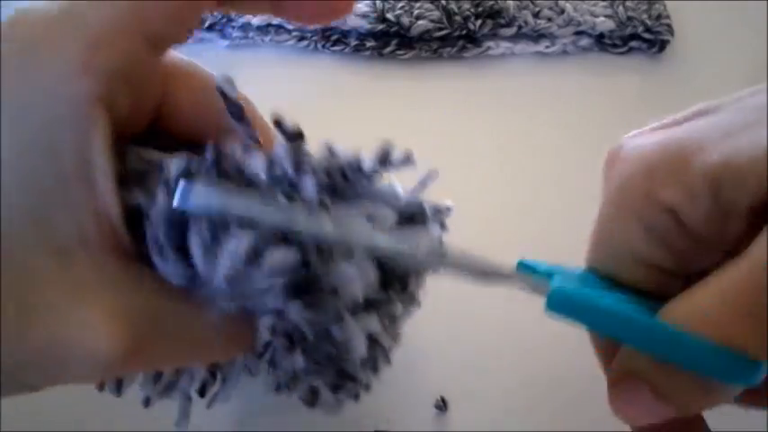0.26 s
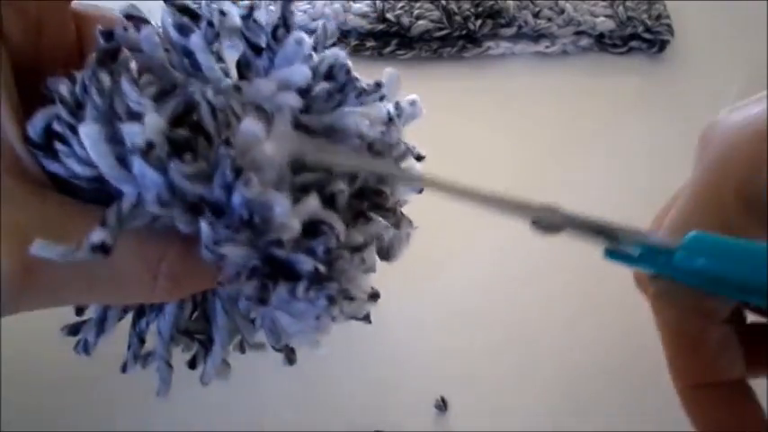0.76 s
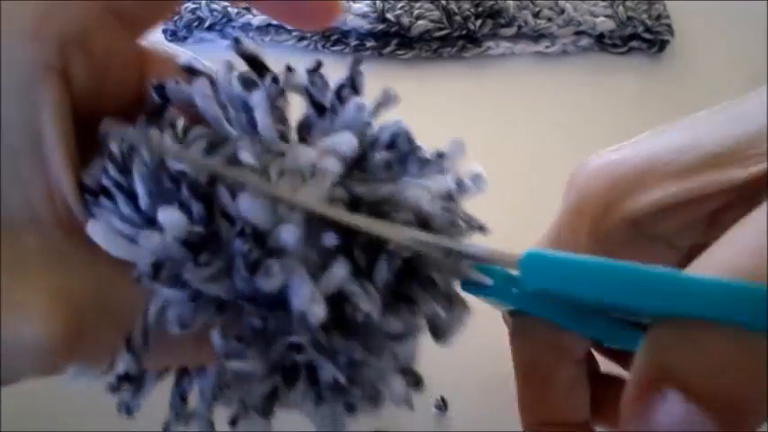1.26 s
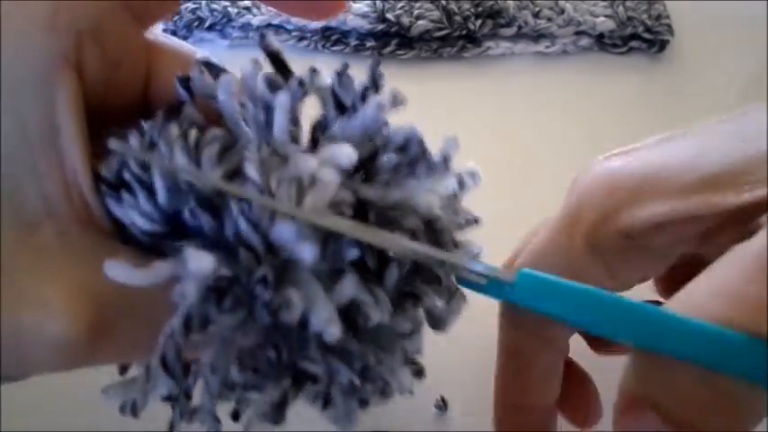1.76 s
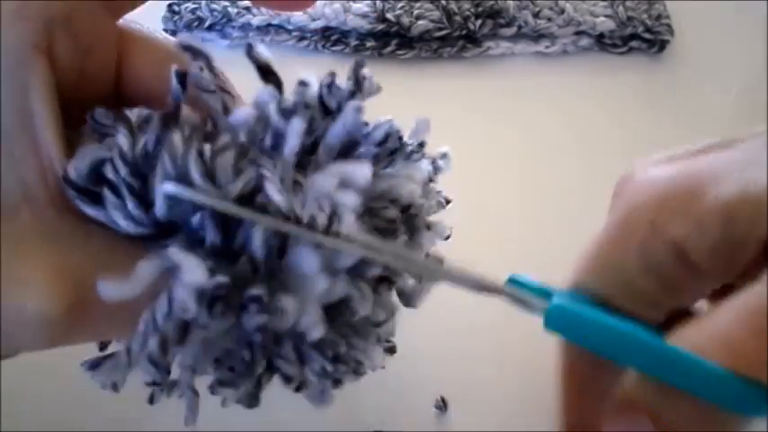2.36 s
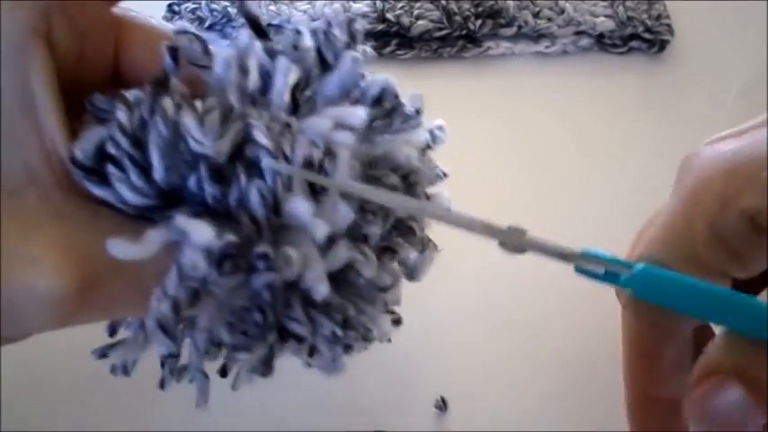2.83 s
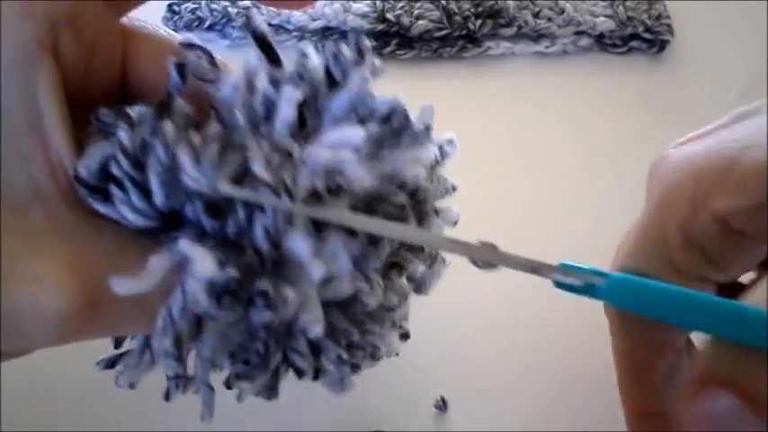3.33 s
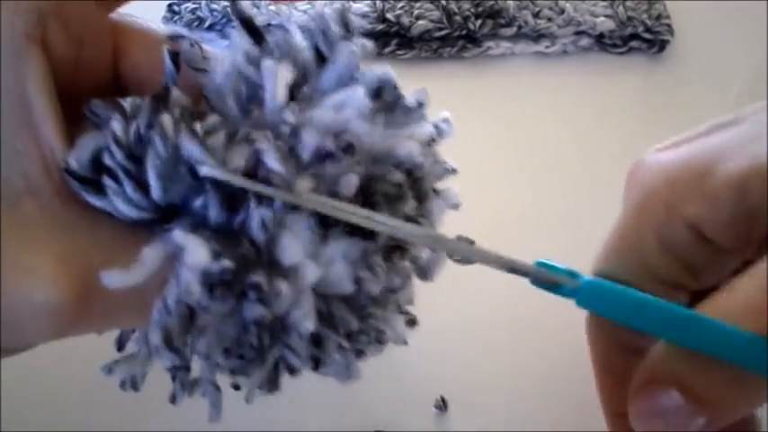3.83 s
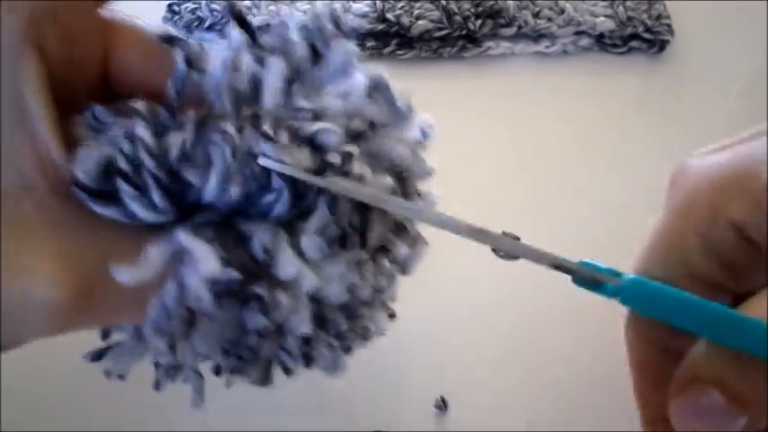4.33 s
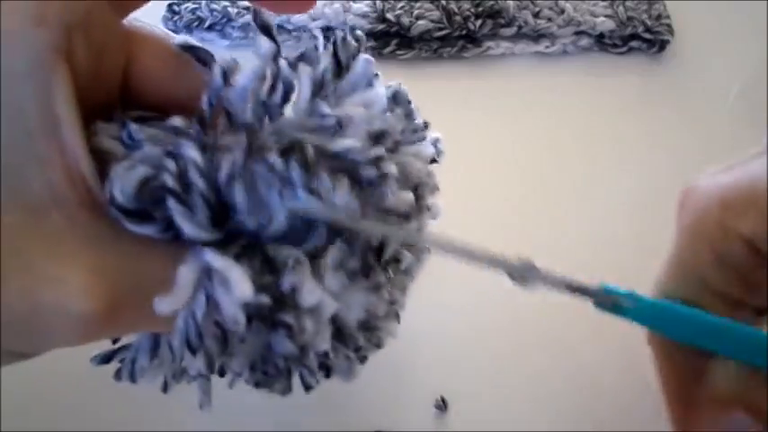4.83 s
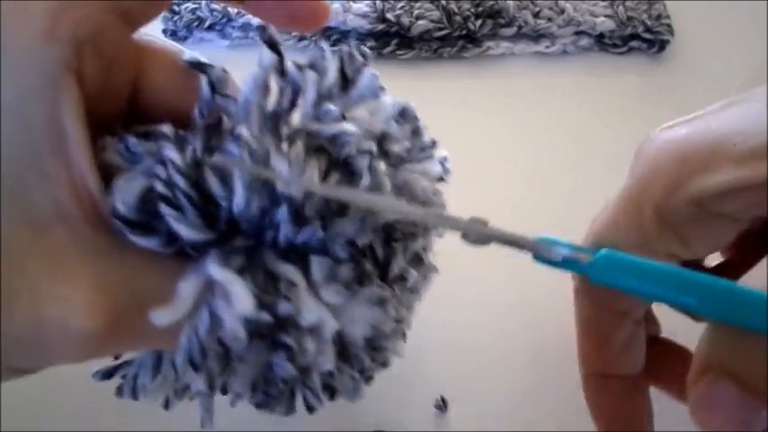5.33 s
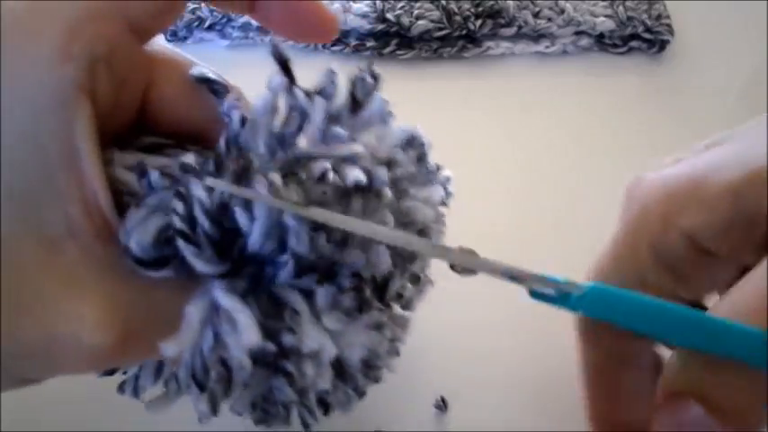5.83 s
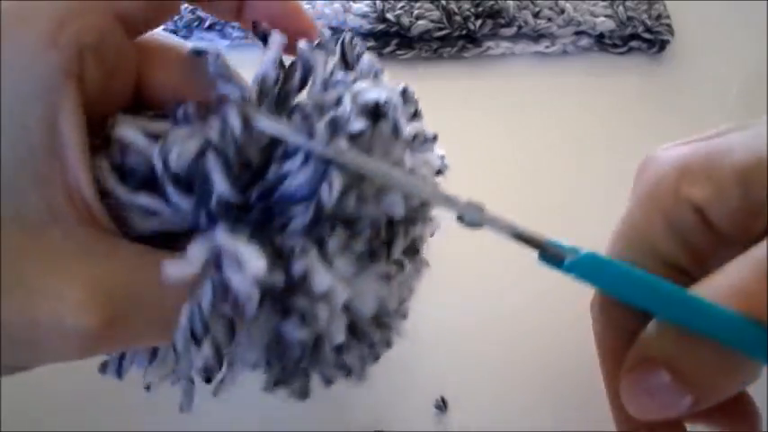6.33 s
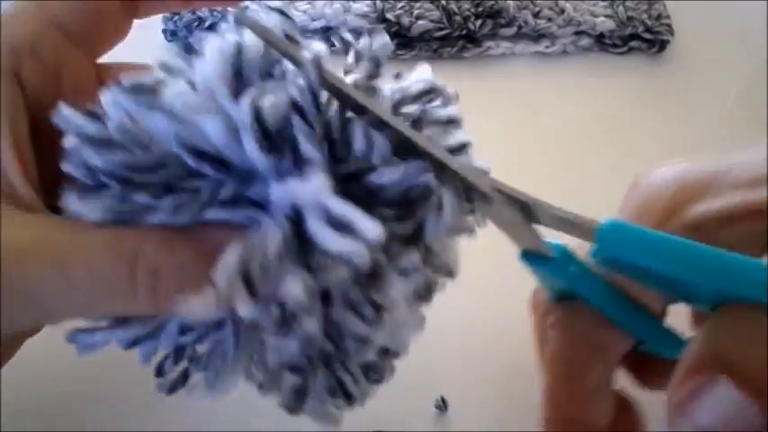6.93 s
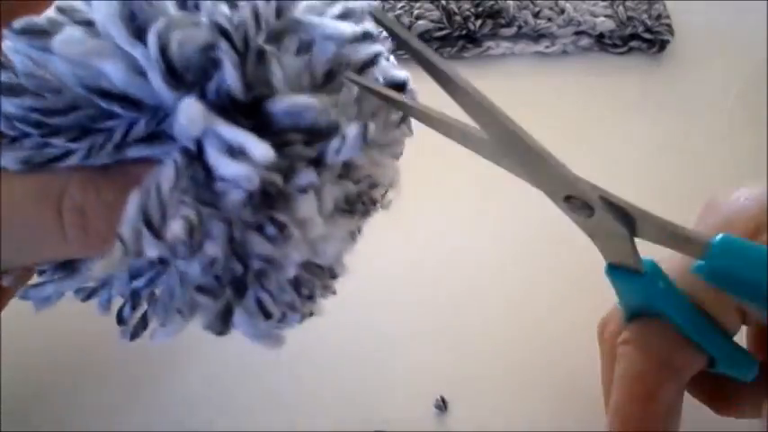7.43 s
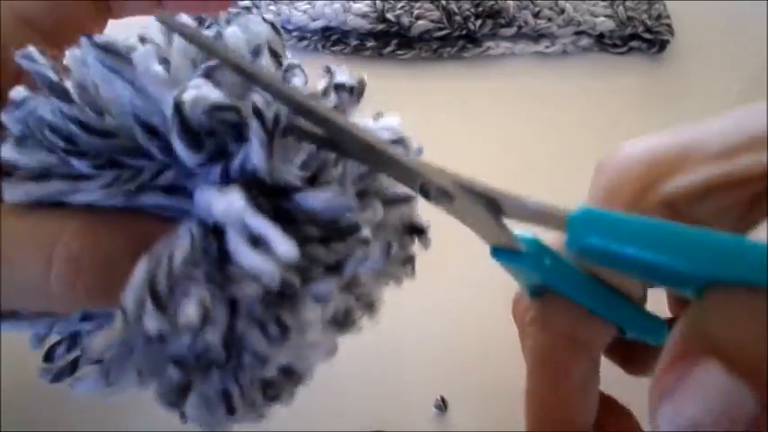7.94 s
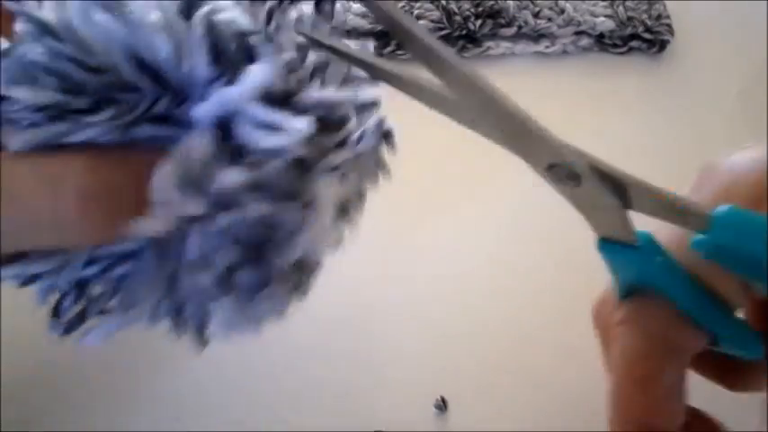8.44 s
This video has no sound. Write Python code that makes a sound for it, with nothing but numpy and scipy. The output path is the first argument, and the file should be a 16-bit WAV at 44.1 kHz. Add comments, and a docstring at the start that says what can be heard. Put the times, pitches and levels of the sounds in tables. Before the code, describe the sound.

Close scissor blades shear through yarn at an uneven pace, clicking shut and ticking open, with faint wool rustling between cuts.

```python
"""Scissors trim a woollen pompom close to a small microphone in a quiet room.
Each stroke shears a crowd of fibres that ring the blades, and tufts give way in bursts.
The blades may clack shut hard enough to overload; on reopening the pivot ticks and the edges scrape.
Between cuts the blades brush the yarn and the wool rustles in the hand."""
import sys
import numpy as np
from scipy import signal
from scipy.fft import rfft, irfft
from scipy.io import wavfile
from scipy.ndimage import uniform_filter1d, map_coordinates

SR = 44100
rng = np.random.default_rng(int(sys.argv[2]) if len(sys.argv) > 2 else 0)


def int16_out(signal):
    """Quantize to a 16-bit WAV file."""
    q = np.round(np.clip(np.atleast_2d(signal).T, -1, 1) * 32767)
    wavfile.write(sys.argv[1], SR, q.astype(np.int16))


N = 383229
TIME_S = np.arange(N) / SR
BIN_HZ = np.maximum(np.fft.rfftfreq(N, 1 / SR), 1)

# blade resonances while cutting: centre_hz, width_hz, level_db
BLADE_LOW_MODES = [(1890, 540, -22), (2260, 320, -11), (3070, 270, -4), (4060, 310, 3), (4580, 470, -0.5),
                   (5230, 530, -2.5)]
BLADE_HIGH_MODES = [(7000, 970, -1), (7800, 410, 2.5), (8390, 340, 3.5), (9880, 510, 0), (10750, 460, -4),
                    (15100, 590, -4)]
# wool crunch spectrum: freq_hz, level_db
CRUNCH_SPECTRUM = [(40, -3), (150, -2.5), (700, 5.5), (1500, -4.5), (2500, 2), (5000, 8), (12000, -36)]


def shear(cut_db=-0.5, brush_db=-1, treble_db=1, crunch_db=-14, grab_db=2.1):
    """Fibres snap between the edges and ring the blades; strands catch and tufts let go."""
    low_gain, high_gain = (
        np.hypot(undb(cut_db) * stroke_gain(treble) + undb(brush_db) * brush_gain(treble),
                 tuft_gain(treble))
        for treble in (False, True))
    snaps = fibres(5500, spread_db=4.5) * undb(grab_db * walk(380))
    low_ring = low_gain * blade_glide(resonate(snaps, BLADE_LOW_MODES))
    high_ring = undb(treble_db) * high_gain * resonate(snaps, BLADE_HIGH_MODES)
    crunch = undb(crunch_db) * low_gain * colour(snaps, CRUNCH_SPECTRUM)
    return low_ring + high_ring + crunch


# cuts: bite_s, attack_s, hold_s, release_s, level_db, growth_db, bright_db, pitch_ratio
STROKES = [ (0.139, 0.039, 0.056, 0.0083, -40, 9, 3.5, 0.97),
           (1.407, .032, 0.027, .022, -46, -3.5, 3, 0.95), (2.914, .014, 0.041, 0.013, -43.5, 2, 3.5, 1.06),
           (3.353, 0.021, .048, .005, -46.5, -6.5, 4.5, 1.09),
           (3.789, 0.049, 0.025, 0.046, -39.5, -0.5, -1.5, 1.04),
           (4.177, 0.0239, 0.0432, 0.017, -40, 5.5, -0.5, 1.03),
           (4.578, .025, 0.0073, 0.011, -37.5, 0, 1, 1.03), (5.61, .018, 0.087, .011, -40, 4.5, -0.5, 1.03),
           (6.056, 0.011, 0.029, .015, -39.5, 2.5, 2.5, 0.97),
           (7.014, 0.039, .064, 0.0073, -41.5, 4.5, -0.5, 1),
           (8.095, 0.015, 0.036, 0.0056, -38.5, 6, 3, 0.94), ]


def stroke_gain(treble, dulling_db=0.5):
    """Envelope of the cuts; the treble dulls as wool packs between the edges."""
    return sum(gesture(bite_s, attack_s, hold_s, release_s,
                       db + treble * (bright_db + dulling_db / 2), growth_db - treble * dulling_db)
               for bite_s, attack_s, hold_s, release_s, db, growth_db, bright_db, _ in STROKES)


def blade_glide(x, glide_ratio=0.05):
    """Blade pitch rises in each stroke as the crossing point runs towards the tips."""
    points = []
    for bite_s, attack_s, hold_s, release_s, *_, pitch_ratio in STROKES:
        points.append((bite_s - attack_s, pitch_ratio * (1 - glide_ratio / 2)))
        points.append((bite_s + hold_s + release_s, pitch_ratio * (1 + glide_ratio / 2)))
    speed = np.interp(TIME_S, *np.transpose(points))
    return map_coordinates(x, [np.cumsum(speed) % (N - 1)], order=3)


# tuft bursts: peak_s, level_db, half_width_s, bright_db
TUFTS = [(.151, -39.5, 0.0072, 8.5), (.1955, -24, 0.0015, 4.5), (0.217, -24, 0.00076, 13),
         (2.947, -38.5, 0.0034, 3), (2.954, -33, 0.0016, 7), (2.9645, -31.5, 0.0011, 0),
         (3.36, -38, 0.0041, -4), (3.398, -40, 0.0022, 1), (3.761, -44.5, 0.0024, 4.5),
         (3.797, -28.5, .0018, -5.5), (4.184, -36, .0047, -3), (4.215, -30.5, 0.0046, 2),
         (4.585, -33, .0022, -3), (4.613, -39, 0.0031, 4), (5.644, -36, 0.0063, -5),
         (5.697, -31, 0.0019, 1), (6.0925, -32, 0.0014, 6), (7.059, -41, .0033, -6), (8.122, -37, .002, 8),
         (8.136, -28, 0.0036, 0.5)]


def tuft_gain(treble):
    """Envelope of the thickest tufts giving way."""
    gain = np.zeros(N)
    for peak_s, db, half_width_s, bright_db in TUFTS:
        add(gain, peak_s - 2 * half_width_s, undb(db + treble * bright_db) * swell(half_width_s))
    return gain


# blade brushes: peak_s, fade_s, level_db, bright_db
BRUSHES = [(1.63, .036, -56.5, 7), (1.906, 0.083, -48, 2), (2.085, .08, -64.5, 9.5),
           (2.288, 0.066, -50, 2.5), (2.52, .05, -56.5, 6), (2.65, .12, -62, 7.5), (5.113, .026, -52, -2)]


def brush_gain(treble):
    """Envelope of the blades passing lightly through the yarn."""
    return sum(gesture(peak_s, fade_s, 0, fade_s, db + treble * bright_db)
               for peak_s, fade_s, db, bright_db in BRUSHES)


# blade closures: start_s, level_db, pitch_ratio, hardness_db
CLACKS = [(.2185, 1, 1.01, -5), (2.9674, 2, 1.02, -1.5), (3.4027, -1, 0.987, -3), (4.6202, 1, 1.04, -2),
          (6.1102, -11, 1.06, -11), (7.0817, -10, 1.03, -9), (8.1437, -2, 0.99, -7.5)]
# clack spectra of steel, plastic handles and sideways radiation: freq_hz, level_db
STEEL_SPECTRUM = [(60, -51), (600, -31), (1500, -39), (2600, -35), (3300, -32.5), (4500, -28.5),
                  (5200, -14.5), (6300, -10), (7200, -7.5), (8050, -1.5), (8600, -6.5), (9200, -21.5),
                  (10000, -19.5), (12000, -28.5), (16000, -22)]
JOLT_SPECTRUM = [(60, -4), (250, 1), (650, 2.5), (1000, -11.5), (1400, -2), (1900, -5), (2600, 0),
                 (3000, -16), (4600, 3), (6000, -7.5), (12000, -22)]
SIDEWAYS_SPECTRUM = [(100, -32), (1500, -27), (2600, -10.5), (4800, -14), (6400, 2), (7300, 0), (8150, 3),
                     (9200, -13), (10500, -13), (12000, -35), (16000, -50)]


def clacks(jolt_db=-24, jolt_lag_s=0.0006):
    """Blades meet, then the blow reaches the handles. Returns direct and sideways sound."""
    jolts = strikes(CLACKS, JOLT_SPECTRUM, chatter_gain=0.078, chatter_s=0.0018)
    steel = strikes(CLACKS, STEEL_SPECTRUM, chatter_gain=0.073, chatter_s=0.00091)
    sideways = strikes(CLACKS, SIDEWAYS_SPECTRUM, chatter_gain=0.046, chatter_s=0.0007)
    return steel + undb(jolt_db) * np.roll(jolts, int(jolt_lag_s * SR)), sideways


# pivot contacts: start_s, level_db, pitch_ratio, hardness_db
TICKS = [(.0893, -36.5, 1.03, 0), (.332, -43, 1.15, -10), (2.143, -40, 0.92, -16), (3.1204, -10, 1, 8.5),
         (3.527, -19, 0.96, 6), (3.5285, -27, 0.76, -2), (4.8218, -33.5, 0.97, 1), (4.831, -32, 0.92, -6),
         (5.123, -43, 0.83, -4), (6.742, -19.5, 0.99, -3)]
# steel under a tick: freq_hz, level_db
TICK_SPECTRUM = [(100, -31), (2000, -42), (4000, -18), (5200, -26), (6300, -11.5), (7200, -21.5),
                 (8000, -0.5), (8700, 0.5), (10000, -13), (12000, -21.5), (15300, -13.5), (16500, -9.5)]


def pivot_ticks():
    """The pivot ticks as the blades reopen or shift."""
    return strikes(TICKS, TICK_SPECTRUM, chatter_gain=0.15, chatter_s=0.0021)


# edge squeaks: peak_s, level_db, half_width_s, slip_hz, second_harmonic_db
SQUEAKS = [(7.071, -44.5, 0.0076, 2160, 13.5), (8.1385, -16.5, 0.00121, 4034, -7)]


def squeaks(jitter_ratio=0.02):
    """Near the tips the edges stick and slip at a rough pitch."""
    out, wobble = np.zeros(N), walk(700)
    for peak_s, db, half_width_s, slip_hz, second_db in SQUEAKS:
        gain = undb(db) * swell(half_width_s)
        pitch_hz = slip_hz * (1 + jitter_ratio * wobble[int(peak_s * SR):][:len(gain)])
        phase = 2 * np.pi * np.cumsum(pitch_hz) / SR
        tone = np.sin(phase) + undb(second_db) * np.sin(2 * phase)
        add(out, peak_s - 2 * half_width_s, np.sqrt(2) * gain * tone)
    return out


# edges sliding apart: start_s, level_db, t60_s
SCRAPES = [(.331, -47.5, 0.23), (3.5265, -37, 0.025), (4.821, -39.5, 0.039), (6.741, -43.5, 0.076),
           (7.209, -40.5, 0.12), (8.275, -43, 0.15)]
# free blade resonances: centre_hz, width_hz, level_db
BLADE_FREE_MODES = [(1490, 500, -14), (3130, 590, -10.5), (3950, 520, -1), (5200, 730, -12),
                    (8000, 730, -5.5), (15300, 570, -14)]


def scrapes():
    """Bare edges rub as the scissors reopen."""
    return decays(SCRAPES) * resonate(fibres(5000, spread_db=0.5), BLADE_FREE_MODES)


# finger bumps: start_s, level_db, t60_s
KNOCKS = [(.194, -36.5, 0.038), (2.141, -41, 0.16), (8.134, -45, 0.096)]
# handle spectrum: freq_hz, level_db
HANDLE_SPECTRUM = [(30, -35), (110, 2.5), (170, -10), (240, 5), (400, -15), (650, -16), (2000, -24),
                   (8000, -50)]


def knocks():
    """Fingers bump the plastic handles."""
    return decays(KNOCKS) * colour(rng.standard_normal(N), HANDLE_SPECTRUM)


# wool shifting in the hand: peak_s, fade_s, level_db
RUSTLES = [(.914, 0.054, -57.5), (.998, 0.074, -50.5), (1.1, 0.14, -47), (5.425, .11, -51),
           (6.56, .3, -59.5)]
# rustle spectrum: freq_hz, level_db
WOOL_SPECTRUM = [(200, -23), (900, -0.5), (1400, 6), (2000, 5.5), (2600, -3.5), (3500, 3.5), (5200, -4.5),
                 (8200, 6.5), (10000, -9), (15500, -22)]


def rustle(trim_db=-1):
    """Strands slide over each other as the pompom is turned."""
    gain = sum(gesture(peak_s, fade_s, 0, fade_s, db) for peak_s, fade_s, db in RUSTLES)
    return undb(trim_db) * gain * colour(fibres(1500, spread_db=2.5), WOOL_SPECTRUM)


# table and wall reflections: delay_s, level_db
ECHOES = [(.0063, -7.5), (.0083, -24), (.0118, -13), (.0138, -16), (.0148, -8), (.022, -6.5)]
# reverb spectrum, top absorbed by air and furnishings: freq_hz, level_db
ROOM_SPECTRUM = [(3500, -0.5), (6500, 0), (9000, 2.5), (13000, -8)]


def room(x, t60_s=0.38, gap_s=0.0073, early_db=-6, early_s=0.022):
    """Small room: a few distinct reflections, then a short even tail."""
    t = np.arange(SR // 2) / SR
    decay = np.exp(-np.log(1000) * t / t60_s) * (1 + undb(early_db) * np.exp(-t / early_s))
    response = rng.standard_normal(len(t)) * decay * (t > gap_s)
    response /= np.sqrt(np.sum(response ** 2))
    for delay_s, db in ECHOES:
        response[int(delay_s * SR)] += undb(db)
    response = irfft(rfft(response) * curve(ROOM_SPECTRUM, np.fft.rfftfreq(len(t), 1 / SR)))
    return signal.fftconvolve(x, response)[:N]


# room tone and microphone hiss: freq_hz, density_db
FLOOR_SPECTRUM = [(12, -51), (20, -2.5), (65, -9), (93, -1), (130, -4.5), (158, -2.5), (285, -2), (574, -5),
                  (873, -7), (1030, -8), (3530, -13.5), (5530, -15), (8650, -13), (9400, -13.5),
                  (16000, -22.5)]
# narrow hiss bands: centre_hz, width_hz, level_db
HISS_BANDS = [(7500, 300, -26), (8270, 430, 9), (8730, 120, 11)]


def noise_floor(tone_db=-55, hiss_db=-68, waver_db=0.5):
    """Low room tone under a thin microphone hiss."""
    tone = undb(tone_db + waver_db * walk(6)) * colour(rng.standard_normal(N), FLOOR_SPECTRUM)
    return tone + undb(hiss_db) * resonate(rng.standard_normal(N), HISS_BANDS)


def strikes(events, spectrum, chatter_gain, chatter_s):
    """Hard contacts with brief chatter, damped by the hand; levels are energy over 1 ms."""
    out, t = np.zeros(N), np.arange(SR // 100) / SR
    for start_s, db, pitch_ratio, hardness_db in events:
        force = chatter_gain * rng.standard_normal(len(t)) * np.exp(-t / chatter_s)
        force[0] += 1
        hit = signal.fftconvolve(force, body_response(spectrum, pitch_ratio, hardness_db))
        add(out, start_s, hit * undb(db) / np.sqrt(np.sum(hit ** 2) / (SR / 1000)))
    return out


def body_response(spectrum, pitch_ratio, hardness_db, size=2048):
    """Minimum-phase impulse response; a harder contact lifts the top."""
    hz = np.fft.rfftfreq(size, 1 / SR)
    gain = curve(spectrum, hz / pitch_ratio) * curve([(7000, 0), (13000, hardness_db)], hz)
    cepstrum = irfft(np.log(gain))
    cepstrum[1:size // 2] *= 2
    cepstrum[size // 2 + 1:] = 0
    return irfft(np.exp(rfft(cepstrum)))


def fibres(rate_hz, spread_db):
    """Dense crackle of tiny, unequal snaps."""
    snaps = rng.random(N) < rate_hz / SR
    return snaps * np.sign(rng.standard_normal(N)) * undb(spread_db * rng.standard_normal(N))


def gesture(start_s, attack_s, hold_s, release_s, db, growth_db=0, fade_db=22.5):
    """Envelope of one hand movement: attack up to start_s, sloping hold, release."""
    before = np.maximum(start_s - TIME_S, 0) / attack_s
    after = np.maximum(TIME_S - start_s - hold_s, 0) / release_s
    hold_db = db + np.interp(TIME_S, [start_s, start_s + hold_s], [0, growth_db])
    return undb(hold_db - fade_db * np.minimum(before + after, 10))


def decays(events):
    """Envelope of sudden starts that die away."""
    gain, t = np.zeros(N), np.arange(SR // 3) / SR
    for start_s, db, t60_s in events:
        add(gain, start_s, undb(db) * np.exp(-np.log(1000) * t / t60_s))
    return gain


def swell(half_width_s):
    """Raised cosine, four half widths long."""
    t = np.arange(-2 * half_width_s, 2 * half_width_s, 1 / SR)
    return np.cos(np.pi / 4 * t / half_width_s) ** 2


def walk(rate_hz):
    """Smooth random motion, unit rms."""
    step = int(SR / rate_hz)
    stairs = np.repeat(rng.standard_normal(N // step + 1), step)[:N]
    return unit_rms(uniform_filter1d(stairs, step))


def resonate(x, modes):
    """Steep-sided resonances, unit rms out."""
    power = sum(undb(db) ** 2 / (1 + ((BIN_HZ - hz) / width_hz) ** 2) ** 2 for hz, width_hz, db in modes)
    return unit_rms(irfft(rfft(x) * np.sqrt(power), N))


def colour(x, spectrum):
    """Broad spectral shaping, unit rms out."""
    return unit_rms(irfft(rfft(x) * curve(spectrum, BIN_HZ), N))


def curve(spectrum, hz):
    """Spectrum gain, interpolated in log frequency."""
    freq_hz, db = np.transpose(spectrum)
    return undb(np.interp(np.log(np.maximum(hz, 1)), np.log(freq_hz), db))


def add(track, start_s, sound):
    """Mix in place."""
    i = int(start_s * SR)
    track[i:i + len(sound)] += sound[:N - i]


def unit_rms(x):
    return x / np.sqrt(np.mean(x ** 2))


def undb(db):
    return 10 ** (np.asarray(db) / 20)


def scene(clack_send_db=-23, tick_send_db=-14, yarn_send_db=-16):
    """Scissors and wool just in front of the microphone, mono."""
    yarn = shear() + scrapes() + rustle() + knocks()
    direct_clacks, sideways = clacks()
    ticks = pivot_ticks()
    reverb = room(undb(clack_send_db) * sideways + undb(tick_send_db) * ticks + undb(yarn_send_db) * yarn)
    return (yarn + squeaks() + direct_clacks + ticks + reverb + noise_floor())[None]


def record(dry, cutoff_hz=15900):
    """The hardest clacks clip the input; a low-pass follows."""
    lowpass = signal.ellip(10, 0.1, 70, cutoff_hz, fs=SR, output="sos")
    return signal.sosfilt(lowpass, np.clip(dry, -1, 1))


dry = scene()
out = record(dry)
int16_out(out)
```